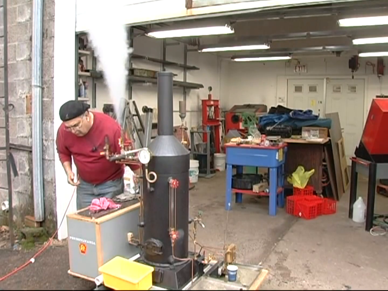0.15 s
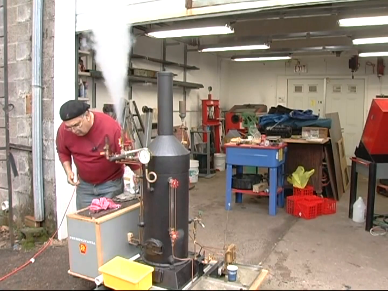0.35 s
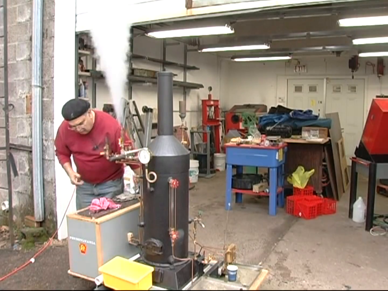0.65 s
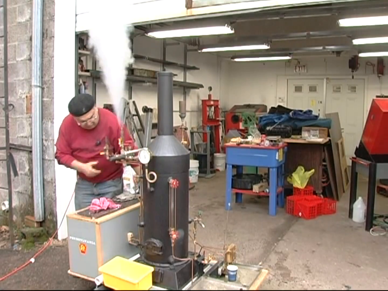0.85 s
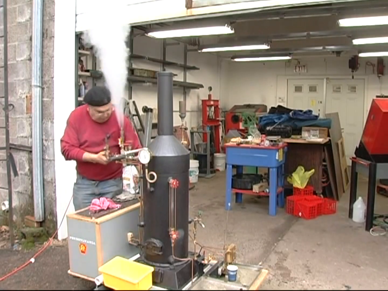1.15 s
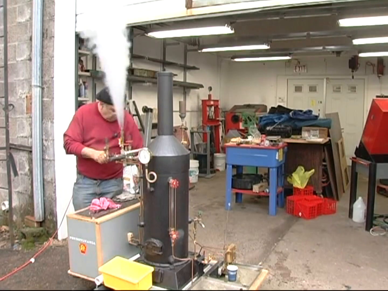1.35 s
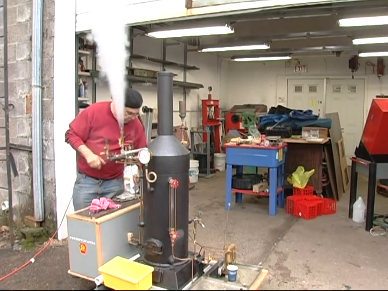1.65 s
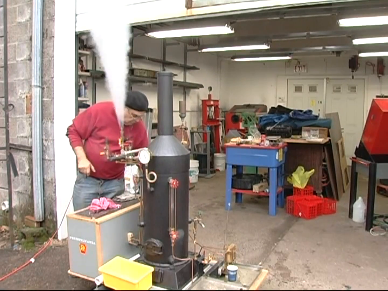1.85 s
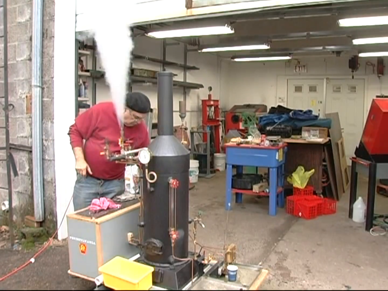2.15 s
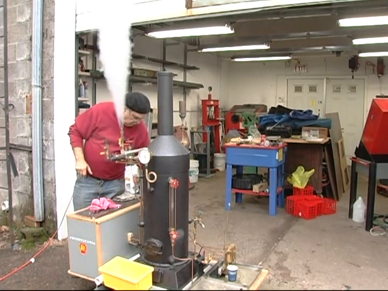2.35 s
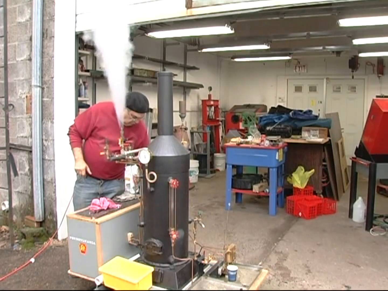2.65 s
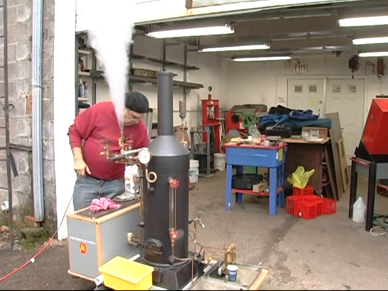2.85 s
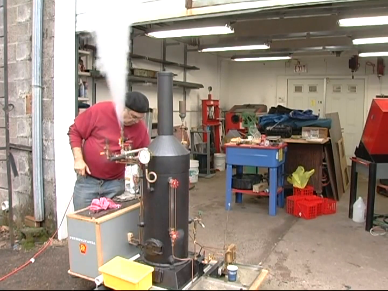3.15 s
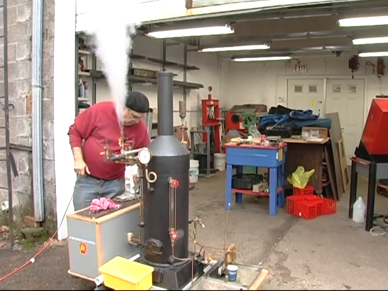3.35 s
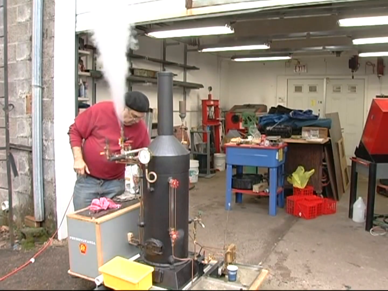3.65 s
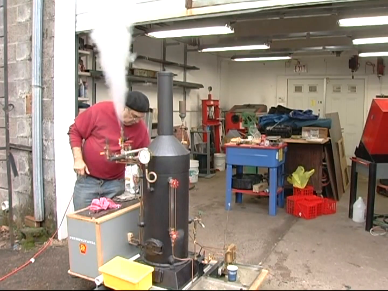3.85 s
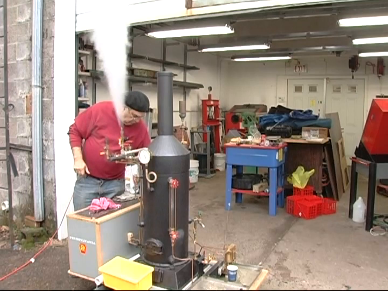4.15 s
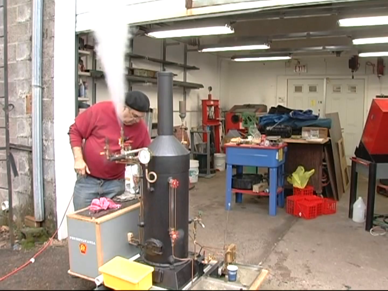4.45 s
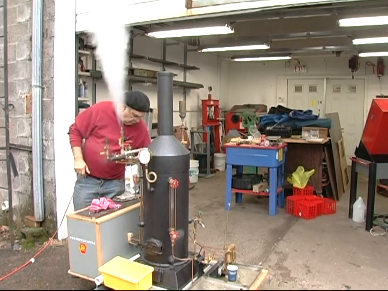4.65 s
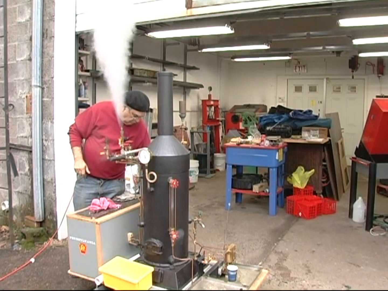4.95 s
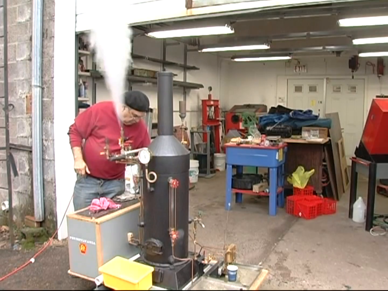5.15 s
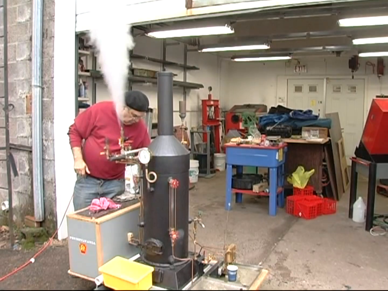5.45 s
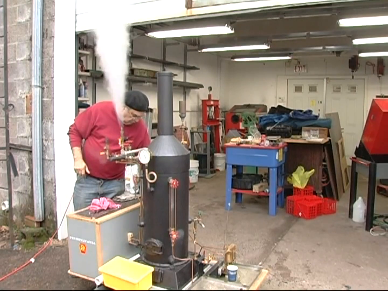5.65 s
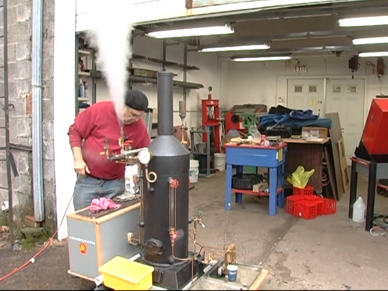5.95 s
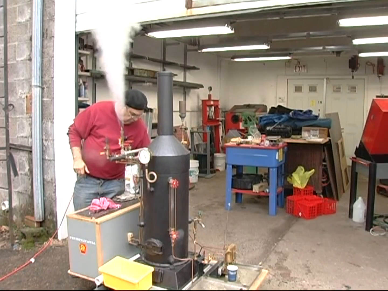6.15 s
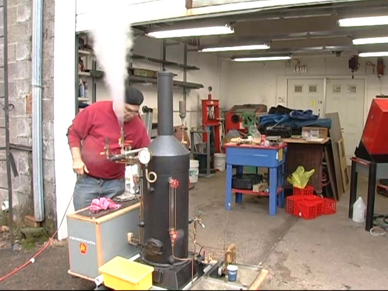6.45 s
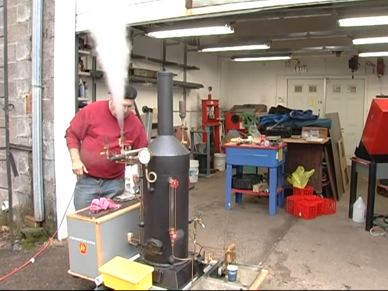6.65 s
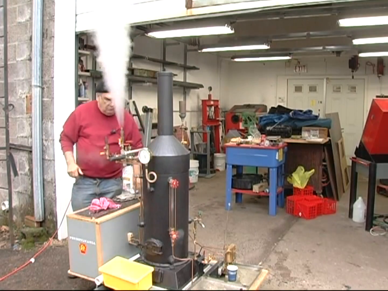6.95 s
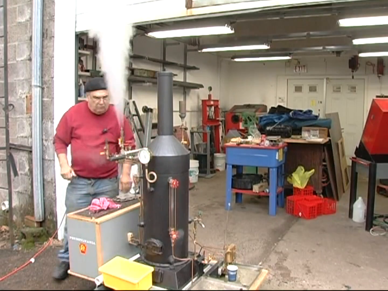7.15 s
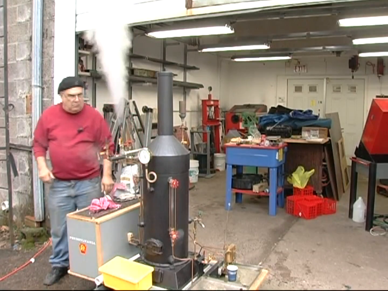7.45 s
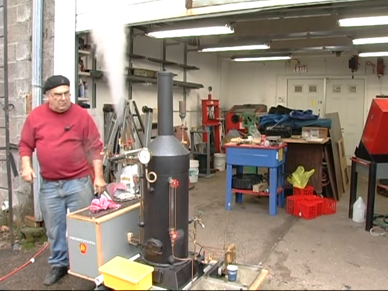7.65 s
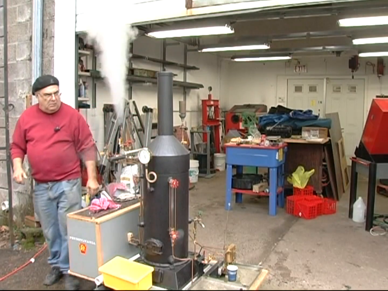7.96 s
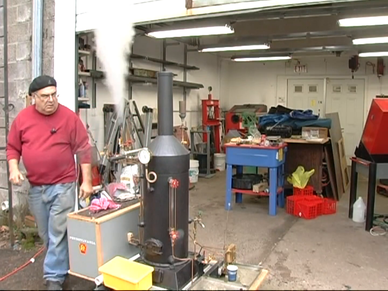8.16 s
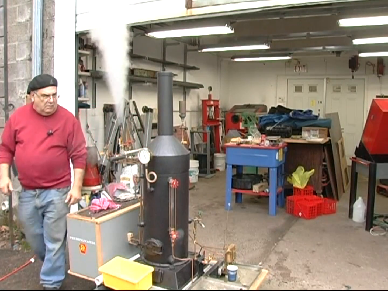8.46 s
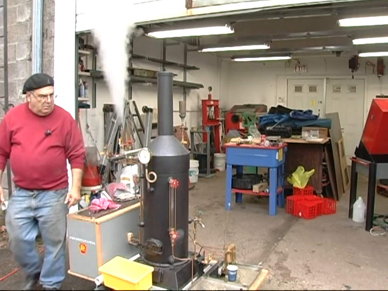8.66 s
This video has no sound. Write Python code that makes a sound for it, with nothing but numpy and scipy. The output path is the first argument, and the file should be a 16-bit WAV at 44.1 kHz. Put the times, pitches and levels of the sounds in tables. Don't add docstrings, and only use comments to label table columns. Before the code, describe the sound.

A steam safety valve hisses loudly and without pause, a piercing rush strongest around 5 kHz over a low roar. The left side is a fixed microphone two metres off; the right is a lapel microphone beside the valve, its hiss brightening and dulling as the man bends and turns. A soft cloth bump, a faint ringing knock on the boiler, a brief valve stutter and a momentary signal loss punctuate it.

```python
import sys
import numpy as np
from scipy import signal
from scipy.fft import rfft, irfft, next_fast_len
from scipy.io import wavfile
from scipy.ndimage import uniform_filter1d, map_coordinates

SR = 44100
rng = np.random.default_rng(int(sys.argv[2]) if len(sys.argv) > 2 else 0)


def nominal_scale(level):
    x = np.asarray(level, float) / 20
    return 10 ** x


def waveform_to_disk(signal):
    frames = np.transpose(np.atleast_2d(signal))
    scaled = np.clip(frames, -1, 1) * 32767
    samples = np.round(scaled).astype(np.int16)
    wavfile.write(sys.argv[1], SR, samples)


N = 388063
TIME = np.arange(N) / SR
TURN_S = .25

# f/Hz, level/dB rms
HUM = (150, -64.5)
# t/s, level/dB, length/s
PUFFS = [
    (3.85, -60, .3),
    (5.7, -61, .2),
    (6.6, -54.5, .22),
    (7.15, -61, .1),
]
# t/s, level/dB, length/s
BUMP = (1.2952, -26, .0017)
# t/s, lapel level/dB, far level/dB
KNOCK = (3.474, -46, -48)
# f/Hz, level/dB, t60/s
SHELL_MODES = [
    (214, 3, 2.6),
    (275, -3, .25),
    (560, 4, .15),
    (760, 1, .15),
    (1050, 3, .06),
]
# t/s, level/dB
FAR_GAIN = [(0, 2), (.35, 2.8), (.75, 2.3), (.9, -.6), (1.4, -3), (1.8, -1.3), (2.3, -1.5), (2.6, -.3),
            (3.1, -1.2), (3.7, .8), (4.2, -.7), (5.9, -1.3), (6.1, .1), (6.9, -2), (7.5, 1.9), (8.3, 2),
            (8.55, .7), (8.7, -1.8)]
# f/Hz, level/dB per Hz
FAR_SPECTRUM = [(40, -27), (220, -29.5), (550, -21.5), (1500, -15.5), (2200, -11.3), (2800, -4),
                (4000, -2.5), (5000, 1), (6500, -3), (8400, -13), (10150, -16.5), (10500, -11.5),
                (11800, -9.5), (14000, -22)]
# t/s, lag/s, direct share/0-1
WALK = [
    (0, .0057, .3),
    (7.3, .0056, .3),
    (7.7, .005, .25),
    (8.1, .004, .1),
    (8.8, .003, .05),
]
# lag/s, signed gain
FAR_ECHOES = [
    (.00109, .09),
    (.00163, -.08),
    (.002955, -.13),
    (.003755, .16),
]
# lag/s, signed gain
FIRST_ECHOES = [
    (.00221, .15),
    (.00202, .05),
]
# lag/s, signed gain
LAPEL_ECHOES = [
    (.00109, .06),
    (.00163, .06),
    (.002085, .14),
    (.0022, -.07),
]
# t/s, chest opened to the jet/0-1, body cupped round the lapel/0-1,
# ridge f/Hz, shading edge f/Hz
POSE = [(.08, 1.05, .25, 4130, 6150), (.71, .94, 0, 4450, 5890), (.84, .62, .75, 4800, 5160),
        (1.1, .26, .5, 4250, 5850), (1.45, .14, 1, 4560, 5950), (1.82, .03, .1, 4600, 6090),
        (1.97, -.25, .47, 4380, 6520), (2.61, -.19, .44, 4300, 6400), (3.08, -.28, .4, 4430, 6310),
        (3.91, .02, -.2, 4000, 6250), (5.88, .16, -.08, 5130, 6200), (6.52, .38, .55, 5100, 6320),
        (6.8, -.02, .9, 4860, 7090), (7.08, .39, .8, 4700, 7530), (7.61, .95, .6, 4520, 6350),
        (8.04, 1.13, .9, 4500, 6000), (8.48, 1.14, .21, 4650, 4660), (8.72, .75, .85, 4500, 5150)]
# from t/s, to t/s, echo left/0-1
TURNS = [
    (.78, 1.95, .15),
    (6.45, 7.4, .35),
    (8.4, 9.5, .2),
]
# f/Hz, level/dB per Hz
ROAR = [(25, -41), (60, -30), (150, -26), (520, -20.8), (850, -22.3), (1200, -23), (1550, -21.5),
        (2000, -25), (4000, -35), (13000, -60)]
# t/s, level/dB, length/s
ARM_SHADE = [
    (1.4, -6.5, .42),
    (8.9, -2.2, .9),
    (5.2, 1.1, 1.3),
]
# t/s, length/s, level/dB, centre f/Hz, drift/Hz per s
BAND_DIPS = [
    (.35, .55, -4.5, 12300, 0),
    (6.1, .6, 4, 13300, 0),
    (6.75, .1, -3, 6600, 0),
    (7.0, .3, -5.5, 3600, -700),
]
# t/s, level/dB, length/s
STUTTERS = [
    (6.6, 1.5, .06),
    (6.686, -2.5, .008),
]
# from t/s, share of moments/0-1
TOP_OPEN = [(0, .6), (1.5, .8), (1.8, .15), (3.1, .25), (5.5, .58), (6.5, .3), (7.0, .6), (7.4, .8),
            (7.9, .42), (8.4, .3)]
# start t/s, end t/s, level of a faint fading hiss/dB, its length/s
DROPOUT = (7.7385, 7.8052, -25, .02)


def unit(x):
    return x / np.sqrt(np.mean(x ** 2) + 1e-20)


def along(points, hz):
    f, v = np.transpose(points)
    return np.interp(np.log(hz + 1), np.log(f + 1), v)


def curves(rows, t):
    s, *cols = np.transpose(rows)
    return [np.interp(t, s, c) for c in cols]


def swell(t, s, length):
    return np.exp(-((t - s) / length) ** 2)


def wobble(rate):
    knots = rng.standard_normal(int(N * rate / SR) + 4)
    return map_coordinates(knots, [TIME * rate])


def filtered(x, response):
    m = next_fast_len(N + SR // 2)
    hz = np.fft.rfftfreq(m, 1 / SR)
    return irfft(rfft(x, m) * response(hz), m)[..., :N]


def heard(x, echoes):
    def comb(hz):
        return 1 + sum(gain * np.exp(-2j * np.pi * hz * lag) for lag, gain in echoes)
    return filtered(x, comb)


def shaded(x, gain_db, patchy_db):
    hz, t, z = signal.stft(x, SR, nperseg=512)
    eddies = uniform_filter1d(rng.standard_normal(z.shape), size=7, axis=0)
    eddies = uniform_filter1d(eddies, size=12, axis=1)
    z = z * nominal_scale(gain_db(hz, t) + patchy_db * unit(eddies))
    return signal.istft(z, SR, nperseg=512)[1][:N]


def hum():
    hz, db = HUM
    level = nominal_scale(db + 3.5 + .8 * wobble(3))
    return level * np.sin(2 * np.pi * hz * TIME + .8 * wobble(4)) * [[1], [0]]


def puffs():
    noise = rng.standard_normal(N)
    rumble = unit(filtered(noise, lambda hz: 1 / (1 + ((hz - 52) / 18) ** 2)))
    level = sum(nominal_scale(db) * swell(TIME, s, length) for s, db, length in PUFFS)
    return level * rumble * [[0], [1]]


def bump():
    s, db, length = BUMP
    u = np.maximum(TIME - s, 0) / length
    return nominal_scale(db) * u * np.exp(-u) * (2.4 - u) * [[0], [1]]


def knock():
    s, lapel_db, far_db = KNOCK
    t = np.maximum(TIME - s, 0)
    low, *upper = [nominal_scale(db - 60 * t / t60) * np.sin(2 * np.pi * hz * t) for hz, db, t60 in SHELL_MODES]
    low = low * (1 - np.exp(-t / .04))
    return np.array([nominal_scale(far_db) * sum(upper), nominal_scale(lapel_db) * (low + sum(upper))])


def facing():
    strength = .75 + .4 * curves(POSE, TIME)[0]
    for start, end, left in TURNS:
        away = np.clip(np.minimum(TIME - start, end - TIME) / TURN_S + .5, 0, 1)
        strength = strength + away * (left - strength)
    return strength


def far_colour(hz, t):
    hunt_db = .15 * np.interp(t, TIME, wobble(4))
    spectrum_db = along(FAR_SPECTRUM, hz) - 4.5 * np.maximum(hz - 14000, 0) / 1000
    return spectrum_db[:, None] + curves(FAR_GAIN, t)[0] + hunt_db


def lapel_roar(f, t):
    sag_db = .65 * np.maximum(t - 4.2, 0)
    shade_db = sum(db * swell(t, s, length) for s, db, length in ARM_SHADE)
    return nominal_scale(2 * (along(ROAR, f) + .7 - sag_db + shade_db / (1 + (900 / f) ** 4)))


def band_dips(f, t):
    total_db = 0
    for s, length, db, centre_hz, drift in BAND_DIPS:
        off_hz = f - centre_hz - drift * (t - s)
        total_db = total_db + db * swell(t, s, length) * np.exp(-(off_hz / (.075 * centre_hz)) ** 2)
    return total_db


def lapel_colour(hz, t):
    f = hz[:, None] + 1
    opened, cupped, ridge_hz, high_hz = curves(POSE, t)
    lowered = (6200 - high_hz) / 1000

    def hump(db, centre_hz, width_hz):
        return nominal_scale(2 * db) / (1 + ((f - centre_hz) / width_hz) ** 2) ** 2

    band_db = .05 - 6.6 * cupped * abs(cupped) - .7 * opened + 2.8 * lowered
    low_hz = 3500 - 260 * opened - 85 * cupped + 295 * lowered
    band = nominal_scale(2 * band_db) / (1 + (low_hz / f) ** 17.8) / (1 + (f / high_hz) ** 14.9)
    chest = hump(-18.9 + 11.3 * opened, 2480, 630) * f / (f + 900)
    ridge = hump(-3.9 + 11 * cupped, ridge_hz, 540 - 140 * cupped)
    shoulder_rise = 10.5 * opened + 3.6 * lowered
    shoulder_hz = np.maximum(10050 - 250 * shoulder_rise, 6850)
    shoulder = hump(-25.6 + shoulder_rise, shoulder_hz, 1750) / (1 + (4000 / f) ** 4)
    fizz = hump(-30.5 - 9 * opened, 12900, 1500)
    power = lapel_roar(f, t) + band + chest + ridge + shoulder + fizz
    return band_dips(f, t) + 10 * np.log10(power / (1 + (f / 14000) ** 14))


def jet():
    near, other = rng.standard_normal((2, N))
    lag, share = curves(WALK, TIME)
    share = np.clip(share, 0, .9)
    late = near[np.clip(np.arange(N) - np.round(lag * SR).astype(int), 0, N - 1)]
    mixed = share * late + np.sqrt(1 - share ** 2) * other
    far = shaded(heard(mixed, FAR_ECHOES), far_colour, patchy_db=.65)
    before_turn = TIME < TURNS[0][0] + TURN_S
    echoed = np.where(before_turn, heard(near, FIRST_ECHOES), heard(near, LAPEL_ECHOES))
    lapel = shaded(near + facing() * (echoed - near), lapel_colour, patchy_db=.75)
    flutter_db = .15 * wobble(5) + .5 * wobble(16)
    flutter_db = flutter_db + sum(db * swell(TIME, s, length) for s, db, length in STUTTERS)
    return nominal_scale(flutter_db) * np.array([nominal_scale(-20.2) * unit(far), nominal_scale(-15.55) * unit(lapel)])


def scene():
    return hum() + puffs() + bump() + knock() + jet()


def joined(x):
    bands, bins = 20, 32
    hz, t, z = signal.stft(x, SR, nperseg=2048)
    first = np.searchsorted(hz, 6890)
    last = first + bands * bins
    top = z[:, first:last].reshape(2, bands, bins, -1)

    def size(v):
        return np.sqrt(np.sum(abs(v) ** 2, axis=-2, keepdims=True)) + 1e-12

    both = top[0] + top[1]
    z[:, first:last] = (both / size(both) * size(top)).reshape(2, bands * bins, -1)
    return signal.istft(z, SR, nperseg=2048)[1][:, :N]


def flickering_top(x):
    edge = 14470
    hz, t, z = signal.stft(x, SR, window='cosine', nperseg=2048)
    luck, ragged = rng.random((2, len(t)))
    since, share = np.transpose(TOP_OPEN)
    spare = share[np.searchsorted(since, t, 'right') - 1] - luck
    edge_hz = np.where(spare > 0, edge + 700 + 3000 * spare, edge - 200 + 500 * ragged)
    return signal.istft(z * (hz[:, None] < edge_hz), SR, window='cosine', nperseg=2048)[1][:, :N]


def dropout(x):
    start, end, hiss_db, length = DROPOUT
    lost = (TIME > start) & (TIME < end)
    fade = np.cos(np.pi / 2 * np.clip((TIME - start) / length, 0, 1))
    hiss = filtered(x, lambda hz: (hz > 1800) & (hz < 4700))
    return np.where(lost, nominal_scale(hiss_db + 5) * fade * hiss, x)


def band_limit(x):
    return signal.sosfilt(signal.butter(12, 15730, fs=SR, output="sos"), x)


def record(dry):
    mix = dropout(flickering_top(joined(dry)))
    return band_limit(mix)


dry = scene()
out = record(dry)
waveform_to_disk(out)
```